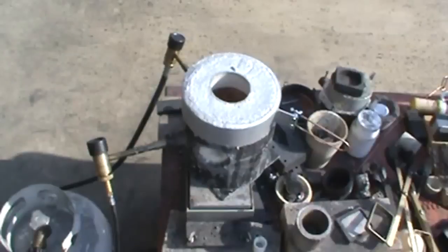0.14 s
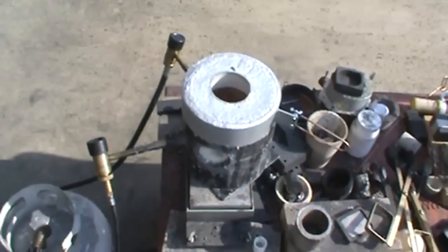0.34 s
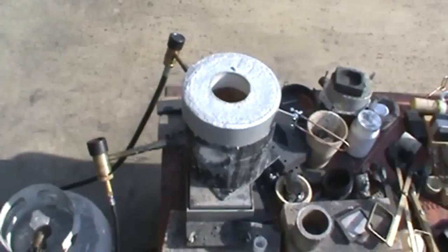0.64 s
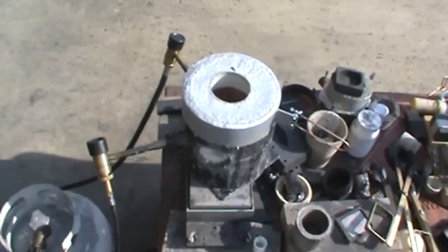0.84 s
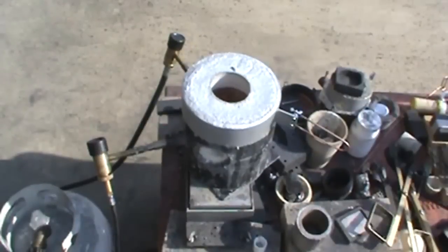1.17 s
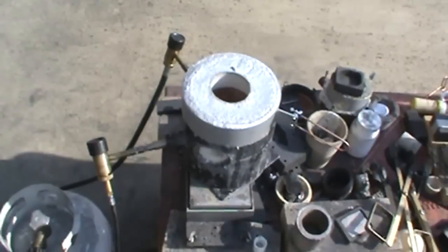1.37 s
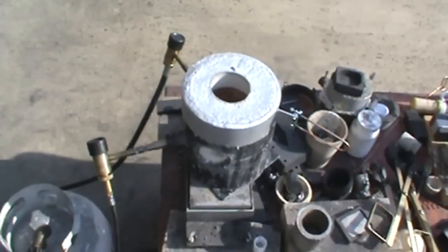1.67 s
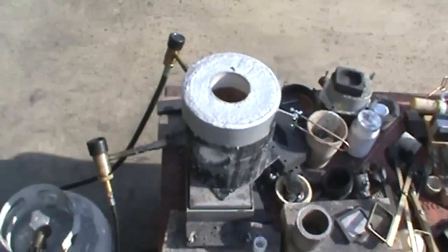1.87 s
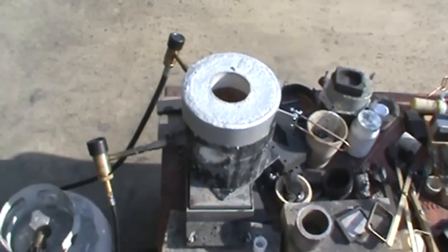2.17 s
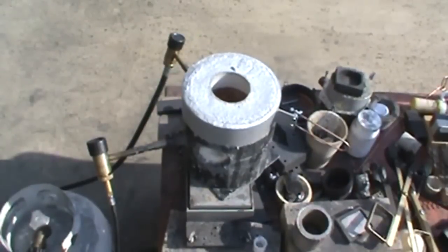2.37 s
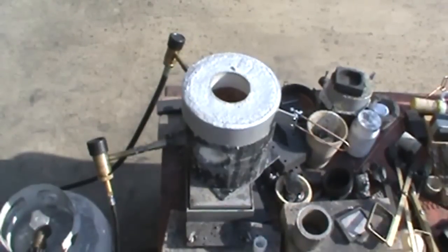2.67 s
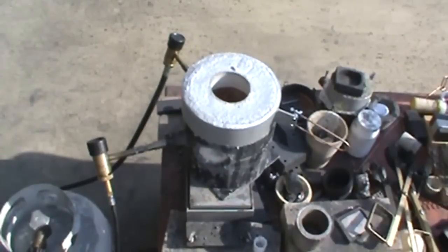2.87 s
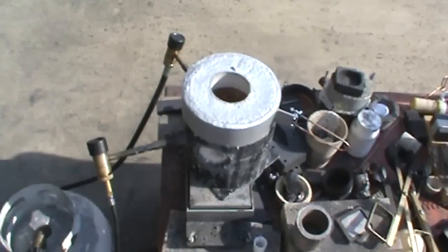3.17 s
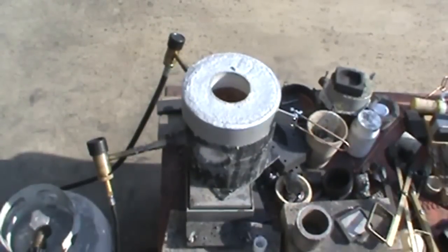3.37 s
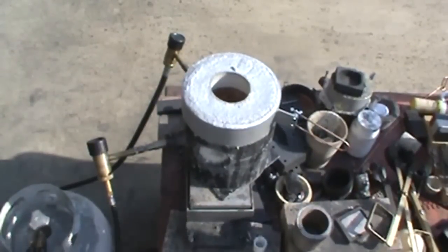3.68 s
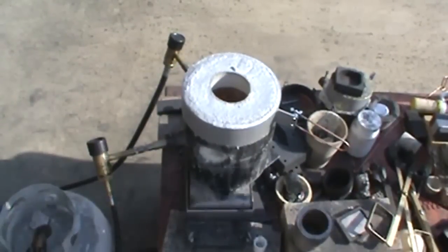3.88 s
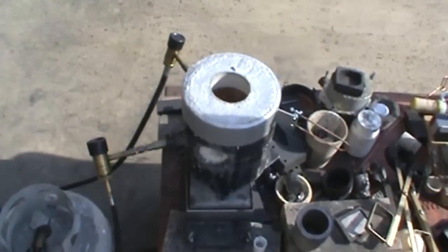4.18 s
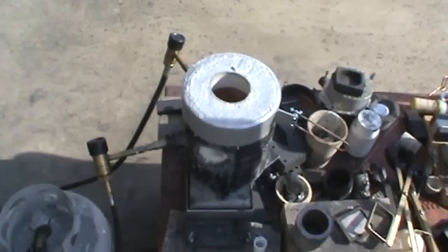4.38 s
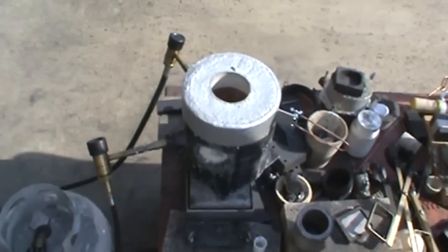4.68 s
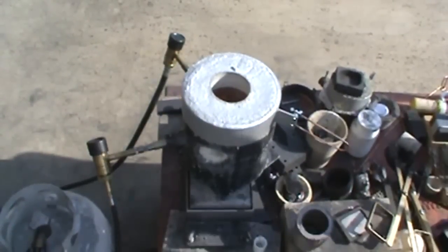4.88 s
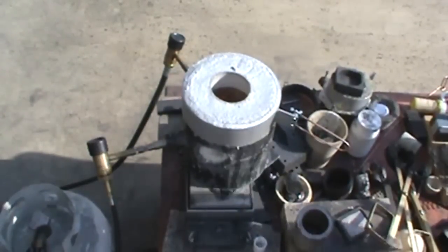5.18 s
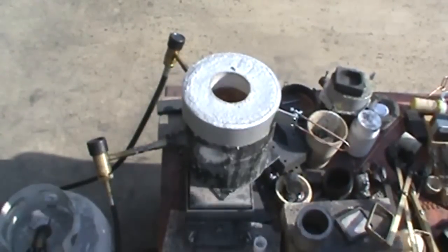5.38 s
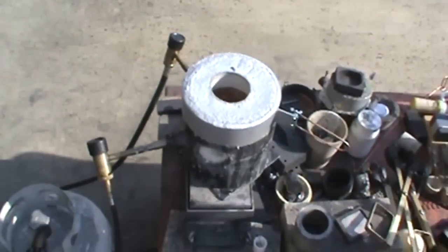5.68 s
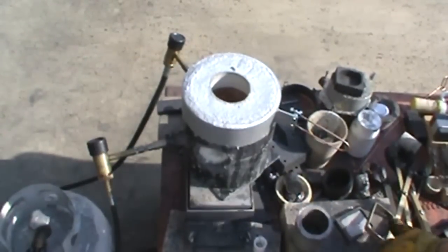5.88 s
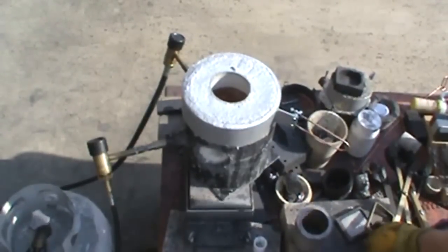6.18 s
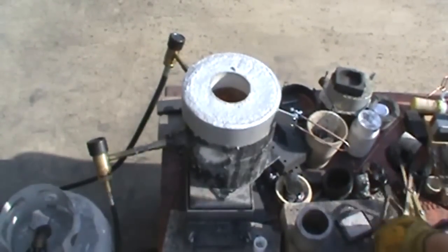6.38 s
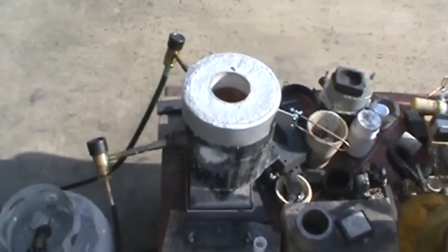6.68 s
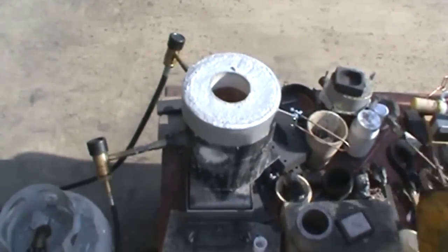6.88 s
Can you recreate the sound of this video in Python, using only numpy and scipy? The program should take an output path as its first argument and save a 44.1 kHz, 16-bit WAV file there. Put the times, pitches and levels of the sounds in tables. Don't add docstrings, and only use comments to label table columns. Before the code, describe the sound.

From 0 to 7 seconds, two gas burners roar without pause into a small melting furnace in an open yard, heard close in stereo. The roar is hollow and low-mid, strongest around 200 to 700 Hz, flickering and flaring irregularly, with short reflections from ground and wall. Above it sits a quieter, bright, slightly tubular gas hiss that flutters in quick puffs. Light breeze makes low, lumpy thumps, mostly in the first 1.3 seconds, then at 2.7 and intermittently from 3.8. A dry tick comes at 1.6, a faint breathy whistle near 8.7 kHz at 2.0 to 2.2, a soft scrape at 2.8 and the sharpest tick at 3.6. From 5.5 the hiss dulls as if blocked, returning by 6.9. A soft tick at 6.4 precedes a short metal ring and weaker rebound at 6.6. The roar continues to the end.

```python
import sys
import numpy as np
from scipy import signal
from scipy.fft import rfft, irfft
from scipy.io import wavfile

SR = 44100
rng = np.random.default_rng(int(sys.argv[2]) if len(sys.argv) > 2 else 0)


def makeup_ratio(level_db):
    decades = np.asarray(level_db, float) / 20
    return 10 ** decades


def unload_wav(signal):
    wavfile.write(
        sys.argv[1],
        SR,
        np.round(np.clip(np.atleast_2d(signal).T, -1, 1) * 32767).astype(np.int16),
    )


N = 310464
HZ = np.maximum(np.fft.rfftfreq(N, 1 / SR), 1)


def rms_one(x):
    return x / np.sqrt(np.mean(x ** 2) + 1e-20)


def level_to(x, low_hz, high_hz):
    band = irfft(rfft(x) * (HZ > low_hz) * (HZ < high_hz), N)
    return 1 / np.sqrt(np.mean(band ** 2))


def in_time(rows):
    s, *columns = np.transpose(rows)
    return [np.interp(np.arange(N) / SR, s, c) for c in columns]


def in_hz(rows):
    hz, *columns = np.transpose(rows)
    return [np.interp(np.log(HZ), np.log(hz), c) for c in columns]


def swells(times_s, swell_db, length_s):
    t = np.arange(0, N + 64, 64) / SR
    bells_db = np.exp(-(2 * (t[:, None] - times_s) / length_s) ** 2) @ swell_db
    return np.interp(np.arange(N) / SR, t, bells_db)


def drift(rate_hz):
    r = np.exp(-80 * np.pi * rate_hz / SR)
    sparse = rng.standard_normal(N // 40 + 2002)
    slow = signal.lfilter([1], [1, -2 * r, r * r], sparse)[2000:]
    return np.interp(np.arange(N) / 40, np.arange(len(slow)), rms_one(slow))


def turbulence(colour, control_db, shared_db, own_db, rate_hz, count=2):
    spectrum = rfft(rng.standard_normal(N)) * colour
    together = drift(rate_hz)
    out = np.zeros(N)
    pitch = np.log2(HZ)
    for octave in np.arange(4, 14.5, 1 / count):
        window = np.cos(np.pi * np.clip((pitch - octave) * count / 2, -.5, .5)) ** 2
        if np.max(window * colour) > np.max(colour) / 300:
            band_db = control_db(2 ** octave) + shared_db * together + own_db * drift(rate_hz)
            out += irfft(spectrum * window, N) * makeup_ratio(band_db)
    return out


def ports(x):
    # f/Hz, in-phase side share, quarter-cycle side share, scattered side/dB
    port_rows = [(60, -0.094, 0.014, -13), (130, -0.06, 0.57, -17), (288, 0.15, 0.31, -11),
                 (513, 0.13, 0.2, -18.5), (900, -0.21, 0.16, -10.5), (1500, -0.22, 0.096, -3.5),
                 (3000, -0.17, 0.24, -10), (4540, -.05, 0.053, -12), (6740, 0.073, 0, -18.5),
                 (13900, -0.089, 0.044, -26)]
    in_phase, quarter, scattered_db = in_hz(port_rows)
    wander = np.cumsum(rng.normal(0, .3, len(HZ)))
    scatter = np.exp(1j * (wander - 2 * np.pi * HZ * .03))
    side = irfft(rfft(x) * (in_phase + 1j * quarter + makeup_ratio(scattered_db) * scatter), N)
    return np.array([x + side, x - side])


def breeze():
    # f/Hz, level/(dB per Hz)
    buffet = [(15, -14), (30, -8), (60, -1.5), (100, 0), (160, -5), (250, -16), (500, -40), (1000, -90)]
    # start/s, length/s, level/dB
    gusts = [(.06, 0.24, -25.5), (0.41, 0.4, -21.5), (.85, 0.17, -35), (1.13, 0.063, -27),
             (1.25, 0.39, -48), (2.743, 0.5, -26), (3.35, .1, -38), (3.82, 0.082, -32), (4.033, 0.16, -27),
             (4.27, 0.054, -28), (4.4, 0.28, -41), (4.69, 0.13, -27), (4.85, 0.24, -29), (5.15, 0.27, -46),
             (5.6, 0.13, -42), (5.797, .25, -31), (6.135, 0.34, -24), (6.583, 0.11, -30)]
    calm_db, rise_db_s, fall_db_s = -50, 500, 250
    t = np.arange(0, N + 64, 64) / SR
    gust_db = calm_db + 0 * t
    for s, length_s, level_db in gusts:
        away_db = np.maximum(rise_db_s * (s - t), fall_db_s * (t - s - length_s))
        gust_db = np.maximum(gust_db, level_db - np.maximum(away_db, 0))
    colour = makeup_ratio(in_hz(buffet)[0])
    across, along = [rms_one(turbulence(colour, lambda hz: 0, shared_db=2.0, own_db=0.0, rate_hz=35.0))
                     for part in range(2)]
    gust = np.interp(np.arange(N) / SR, t, makeup_ratio(gust_db))
    return gust * (across * [[1], [-1]] + makeup_ratio(-10) * along)


def ticks():
    # t/s, peak/dB, crack length/s, crack f/Hz, ring share
    tick_rows = [
        (1.6195, -24, .005, 5200, .1),
        (2.775, -31, .09, 3400, .1),
        (3.6085, -19, .003, 4800, .05),
        (6.36, -29, .02, 2600, .4),
        (6.557, -23, .03, 2600, 1.9),
        (6.569, -28, .025, 2750, .8),
    ]
    ring_ratio, ring_cycles, rise_share = .815, 36, .12
    out, t = np.zeros(N), np.arange(4000) / SR
    grits = rng.standard_normal((len(tick_rows), len(t)))
    for (s, peak_db, length_s, crack_hz, share), grit in zip(tick_rows, grits):
        band = signal.butter(1, [crack_hz / 2.0, crack_hz * 1.6], "band", fs=SR, output="sos")
        envelope = makeup_ratio(-30 * t / length_s) * np.minimum(t / (rise_share * length_s), 1)
        crack = signal.sosfilt(band, grit * envelope) * 1.8
        cycles = ring_ratio * crack_hz * t
        ring = np.sin(2 * np.pi * cycles) * makeup_ratio(-60 * cycles / ring_cycles)
        out[round(s * SR):][:len(t)] += makeup_ratio(peak_db) * (crack + share * ring)
    return out


def whistle():
    # t/s, f/Hz, level/dB
    whistle_rows = [
        (1.96, 8900, -58),
        (2.0, 8750, -33),
        (2.08, 8750, -36),
        (2.16, 8600, -29),
        (2.21, 8600, -30),
        (2.24, 8600, -58),
    ]
    hz, level_db = in_time(whistle_rows)
    turn = 2 * np.pi * np.cumsum(hz) / SR
    main = drift(200.0) * np.sin(turn)
    partner = .2 * drift(200.0) * np.sin(1.58 * turn)
    return makeup_ratio(level_db) * (main + partner)


def shade_db():
    # t/s, hiss level/dB
    clear = [(0, -34), (.5, -34), (.8, -31.5), (1.3, -34), (2.1, -34), (2.4, -34.5), (3.0, -34), (3.5, -35),
             (3.75, -33), (4.6, -34.5), (5.0, -32.5), (5.4, -33.5), (5.52, -37), (5.75, -41), (6.2, -40.5),
             (6.55, -37), (6.9, -32), (7.04, -32.5)]
    clear_db, = in_time(clear)
    return clear_db - clear_db.mean()


def jets():
    # f/Hz, level/dB
    hiss_rows = [(2000, -85), (3000, -17.5), (3700, -18.5), (4500, -11.5), (5400, -11), (5950, -18),
                 (7100, -18.5), (7700, -11), (10000, -10), (13500, -8.5), (13900, -16), (14500, -10.5),
                 (15500, -15)]
    # f/Hz, width/Hz, lift/dB
    tubes = [(3960, 210, -3), (4278, 72, 10.5), (4900, 110, 3), (6525, 580, 8.5), (8100, 510, 6.5),
             (9186, 660, 9), (13450, 200, 2)]
    # t/s, swell/dB
    puffs = [(.2, -1), (.42, -5), (.63, -4), (1.25, 3.5), (1.5, 1), (1.76, 2), (1.95, 0.5), (2.27, 1.5),
             (2.75, -1), (3.0, -2), (3.78, 1.5), (4.05, 3), (4.37, -3), (4.45, 4.5), (4.65, 1.5), (4.87, 3),
             (4.98, -3), (5.05, 2.5), (5.92, -2), (6.07, 2), (6.25, -2), (6.35, 6), (6.44, -3), (6.52, 2),
             (6.6, -3), (6.95, 4.5)]
    hiss_db, puff_s = -37.5, 0.056
    shade_shares = [0.57, 1, .85]
    path_db = shade_db() + swells(*np.transpose(puffs), puff_s)
    colour_db = in_hz(hiss_rows)[0] - 40 * np.maximum(np.log2(2000 / HZ), 0)
    for hz, width_hz, lift_db in tubes:
        colour_db += lift_db / (1 + (2 * (HZ - hz) / width_hz) ** 2)

    def control_db(hz):
        return path_db * shade_shares[np.searchsorted([7200, 10000], hz)]

    hiss = turbulence(makeup_ratio(colour_db), control_db, shared_db=0.1, own_db=1.42, rate_hz=14.0, count=4)
    return hiss * level_to(hiss, 8220, 9670) * makeup_ratio(hiss_db)


def flames():
    # f/Hz, level/dB
    roar_rows = [(18, -38), (30, -29.5), (80, -18), (130, -11.5), (200, -3.5), (270, -8), (340, -6.5),
                 (420, -0.5), (520, -1), (640, -2), (760, -10.5), (900, -15), (1200, -22), (2400, -37),
                 (3020, -39), (3790, -51.5), (5500, -70), (9000, -120)]
    # t/s, draught/dB (above zero the upper chamber roar gains on the lower), strength/dB
    draught = [(0, 1, 1), (.25, 2, 0), (.65, -3.5, 0.5), (1.1, 1, 1), (1.5, -1.5, -1.5), (1.8, -3.5, 2.5),
               (2.1, -0.5, -1.5), (2.45, -1, 1.7), (2.9, 0.5, 2), (3.3, 1, 1), (3.7, 0.5, -.5),
               (4.2, 1.5, 1), (4.6, 1.5, -0.3), (5.3, 1, 0.5), (5.9, -4.5, 1), (6.2, 3, 2.5),
               (6.8, -2, 0.7), (7.04, -2, 2.5)]
    # t/s, swell/dB, length/s
    flares = [(0.197, 1, 0.11), (0.457, 5, 0.074), (0.796, 4.5, .1), (1.123, 0.5, 0.12),
              (1.578, -4.5, 0.078), (1.747, -2, 0.069), (2.238, 5.5, 0.061), (2.417, -2.5, 0.27),
              (2.603, 3.5, 0.056), (2.852, 2, 0.23), (3.0, 2, 0.065), (3.086, -4, 0.053), (3.59, 1.5, 0.12),
              (3.8, 2.5, .15), (4.375, -4, 0.12), (4.52, 0.5, .12), (4.95, 4, 0.11), (5.4, 0.5, .12),
              (5.85, -3, 0.1), (6.25, -2.5, 0.28), (6.68, -5, .08), (6.934, -3, 0.18)]
    roar_db, rumble_growth_db_s = -17.5, .4
    rumble_follows, lower_follows, upper_follows = -0.057, -0.46, 0.42
    flare_in_chamber, shade_in_crackle = 0.18, 0.14
    draught_db, fire_db = in_time(draught)
    flare_db = swells(*np.transpose(flares))
    chamber_db = fire_db + flare_in_chamber * flare_db
    swell_db = [rumble_follows * draught_db + rumble_growth_db_s * (np.arange(N) - N / 2) / SR,
                chamber_db + lower_follows * draught_db,
                chamber_db + upper_follows * draught_db,
                flare_db + shade_in_crackle * shade_db()]

    def control_db(hz):
        return swell_db[np.searchsorted([330, 520, 850], hz)]

    colour = makeup_ratio(in_hz(roar_rows)[0])
    roar = turbulence(colour, control_db, shared_db=0.66, own_db=1.33, rate_hz=5.2, count=3)
    return roar * level_to(roar, 520, 820) * makeup_ratio(roar_db)


def yard(roar):
    # delay/ms, left share, right share, lowest f/Hz, highest f/Hz
    echo_rows = [(4.56, 0.000086, 0.075, 100.0, 2810.0), (6.8, 0.029, 0.21, 680, 660),
                 (9.81, -0.21, -0.076, 830, 1090.0), (11.77, 0.17, 0.17, 450, 240),
                 (15.123, -0.91, -0.42, 590, 310), (16.23, 0.55, 0.33, 440, 305),
                 (22.31, -0.49, -0.28, 380, 330), (26.2, 0.037, 0.034, 100.0, 2770.0),
                 (30.88, 0.09, 0.03, 190, 300.0)]
    echoes = 0
    for delay_ms, left, right, low_hz, high_hz in echo_rows:
        band = 1 / np.sqrt((1 + (low_hz / HZ) ** 6) * (1 + (HZ / high_hz) ** 2))
        delay = np.exp(-2j * np.pi * HZ * delay_ms / 1000)
        echoes = echoes + np.outer([left, right], band * delay)
    return ports(roar) + irfft(rfft(roar) * echoes, N)


def scene():
    return yard(flames()) + ports(jets() + whistle() + ticks()) + breeze()


def low_pass(x):
    return signal.sosfilt(signal.butter(12, 14970, fs=SR, output="sos"), x)


def record(dry):
    limit_db, release_db_s = -5.5, 122
    over_db = np.maximum(20 * np.log10(np.abs(dry).max(axis=0) + 1e-9) - limit_db, 0)
    ramp_db = release_db_s * np.arange(N) / SR
    held_db = np.maximum.accumulate(over_db + ramp_db) - ramp_db
    smooth_db = signal.lfilter([.06], [1, -.94], held_db)
    return low_pass(dry * makeup_ratio(-.85 * smooth_db))


dry = scene()
out = record(dry)
unload_wav(out)
```